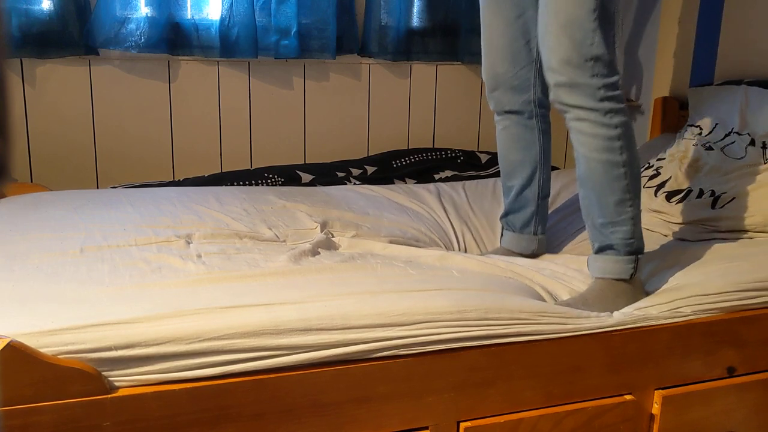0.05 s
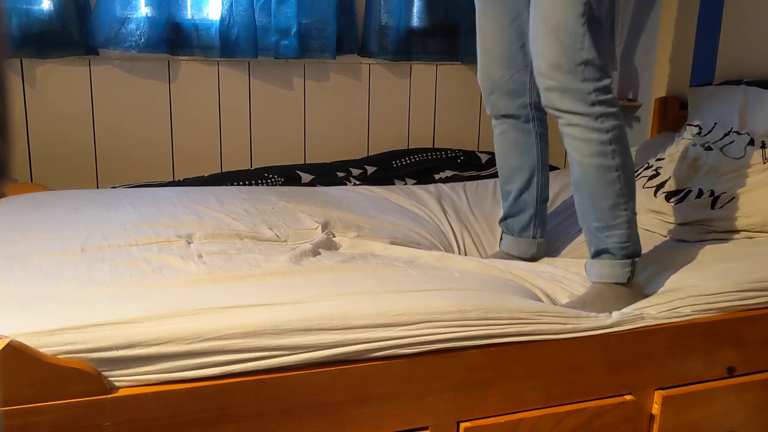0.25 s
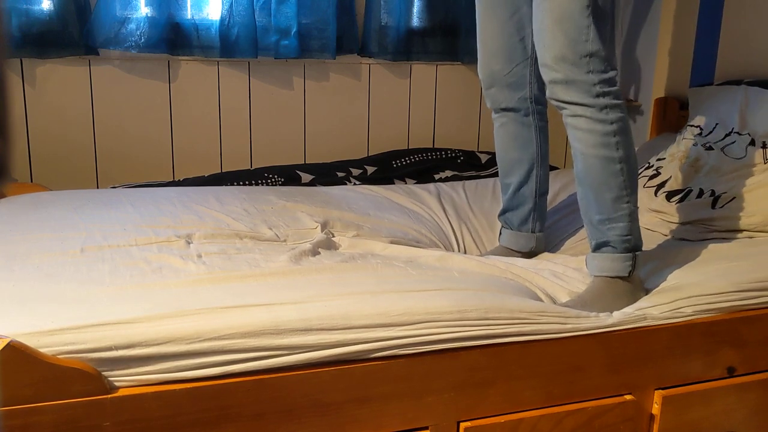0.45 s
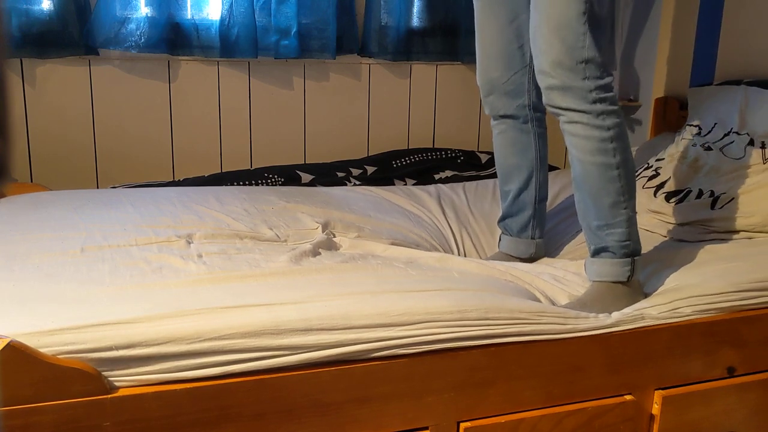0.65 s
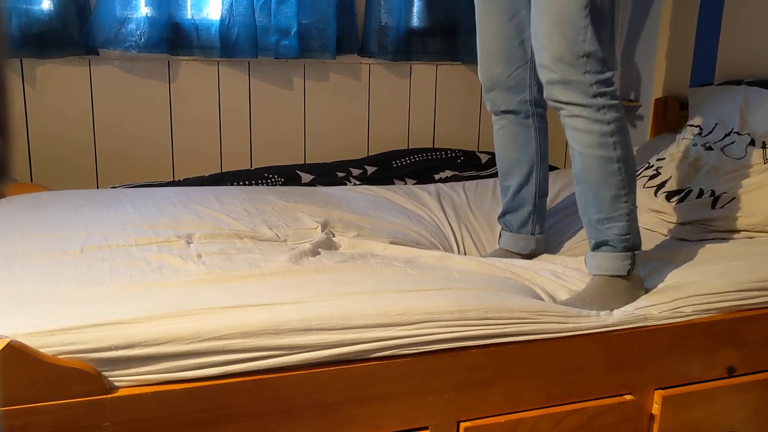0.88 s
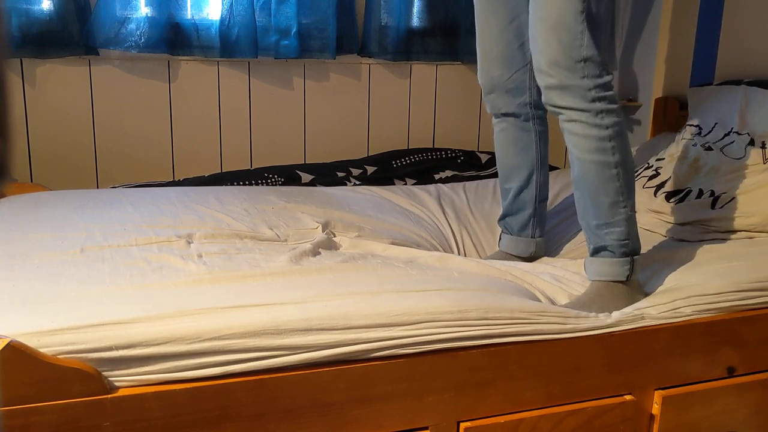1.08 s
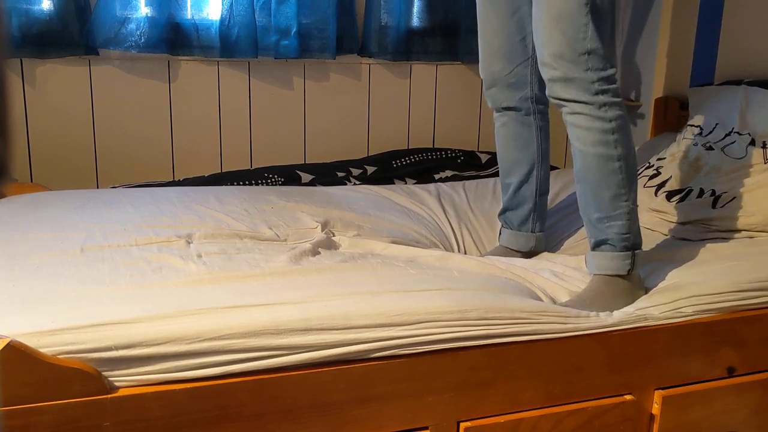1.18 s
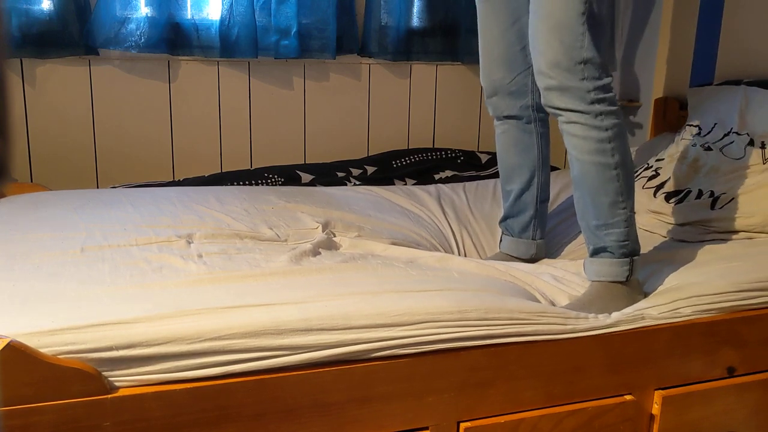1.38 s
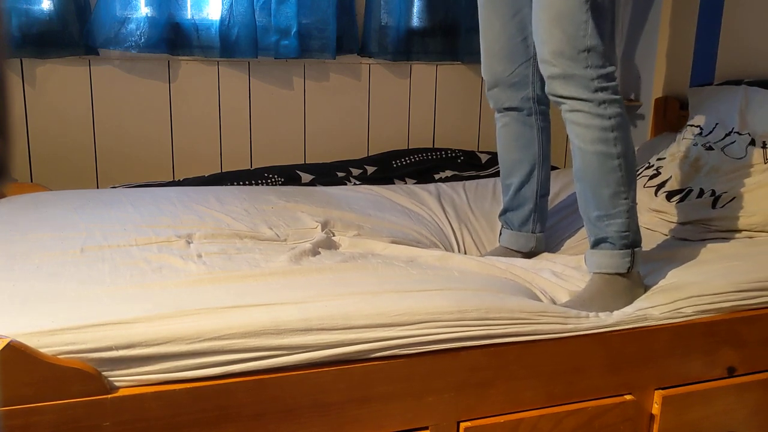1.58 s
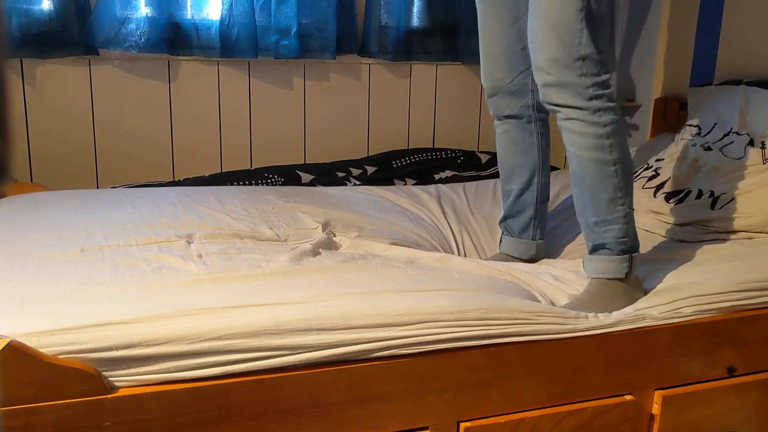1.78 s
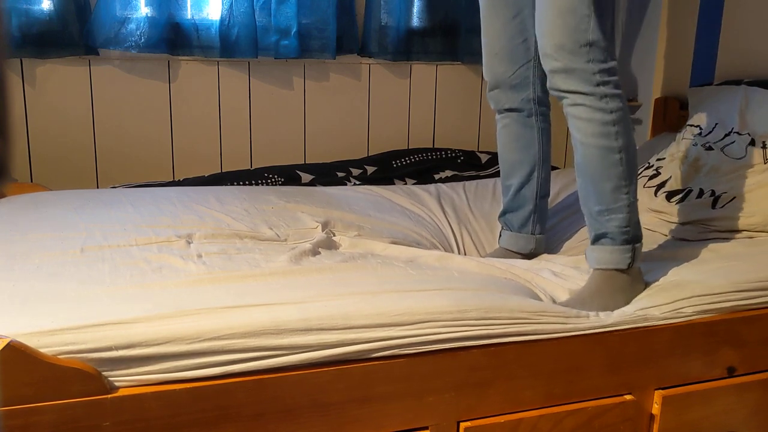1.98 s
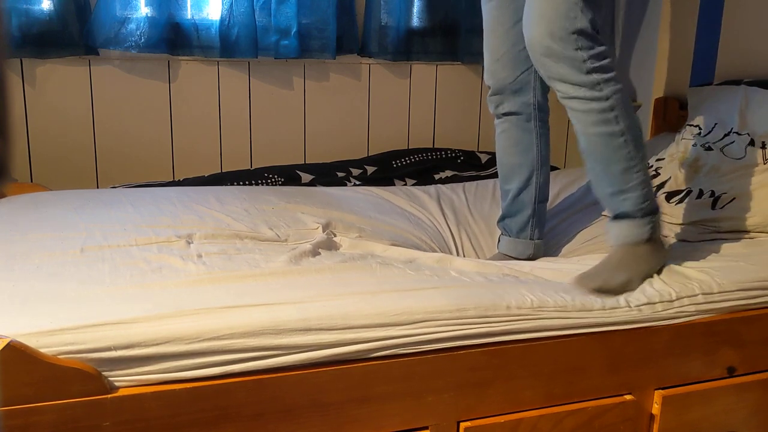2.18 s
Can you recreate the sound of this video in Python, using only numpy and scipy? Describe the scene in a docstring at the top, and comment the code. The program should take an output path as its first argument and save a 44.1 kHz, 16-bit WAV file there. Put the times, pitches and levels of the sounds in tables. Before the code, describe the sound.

Worn wooden bed slats give one loud crack, then a few duller knocks as someone standing on the bed shifts their weight. Soft mattress thuds and faint cloth rustle lie underneath, picked up inside a small, quiet bedroom.

```python
"""Worn bed slats slip on their frame as a person standing on the bed shifts their weight.
One loud crack, then a few duller knocks, each ringing the wood and the small, quiet bedroom.
Underneath, the mattress thuds softly as it settles; bedding and denim rustle over faint room tone.
The stereo microphone is in the room with the bed, and the wood reaches its left side first."""
import sys
import numpy as np
from scipy import signal
from scipy.fft import rfft, irfft
from scipy.io import wavfile
from scipy.ndimage import uniform_filter1d

SR = 44100
rng = np.random.default_rng(int(sys.argv[2]) if len(sys.argv) > 2 else 0)


def to_wav(sig):
    """Store sig (one row per channel, or 1-D mono) as 16-bit WAV at the path in sys.argv[1].

    Samples outside -1..1 are clipped; the rate is SR.
    """
    pcm = np.clip(np.atleast_2d(sig), -1, 1) * 32767
    pcm = np.round(pcm).astype(np.int16)
    wavfile.write(sys.argv[1], SR, pcm.T)  # frames by channels


N = 99225
RING_T = np.arange(int(.6 * SR)) / SR

# slats slipping on the frame: start_s, level_db, lowpass_hz, bass_db, modes_db, kind
SLAT_SLIPS = [(0.2243, -11.5, 2260, 13, -7.5, "crack"), (0.2319, 0, 5600, -7, -1, "crack"),
              (0.2412, -6.5, 3070, -16, -12, "crack"), (.333, -20.5, 240, 9, -9, "tock"),
              (1.0946, -14, 1440, 5.5, -1.5, "clack"), (1.1183, -24, 750, -21, -1, "clack"),
              (1.4911, -34.5, 220, 11.5, -8, "tock"), (1.5103, -31, 785, 7.5, -8, "clack"),
              (1.8911, -26.5, 400, 0, 1.5, "tock"), (1.8952, -20, 1046, -2.5, 1.5, "tock"),
              (2.2192, -21.5, 1175, -10, 4.5, "tock")]
SLIP_KINDS = ["crack", "clack", "tock"]  # each wakes the modes in its own proportions
# modes of slats and frame: pitch_hz, crack_db, clack_db, tock_db
FRAME_MODES = [(119.8, -25.5, -30, -24), (194.2, -26.5, -29.5, -58), (285.3, -26.5, -31, -22),
               (399.7, -36, -27.5, -29), (447.2, -36, -36, -34), (483, -25.5, -25.5, -24),
               (551, -23, -27, -31), (602.2, -25, -33.5, -30.5), (662, -30.5, -22, -54),
               (721, -36, -26, -44), (768, -27.5, -29.5, -35), (810.4, -30.5, -41, -36),
               (933, -26.5, -38, -50.5), (992, -39.5, -28, -33), (1065, -45.5, -36, -30),
               (1215, -30, -25, -35), (1321.5, -24.5, -24.5, -42), (1420, -26.5, -46, -32),
               (1617, -35, -39, -35), (1990, -22.5, -38, -64), (2640, -35.5, -53, -48),
               (2827, -37.5, -44, -41.5), (3300, -36.5, -42, -39)]
MODE_T60_S, MODE_DAMPING = 0.12, .08  # ring time at 500 Hz; power of frequency that shortens it
MODE_RISE_S, MODE_HOLD_S = 0.01, 0.019  # the frame swells and holds a moment before it dies away
MODE_SPREAD_RAD = 0.61  # standing waves in the room shift a mode's phase between the channels

# dense ring of the wood in the room: frequency_hz, band_level_db
WOOD_SPECTRUM = [(45, -24.5), (80, -5.5), (150, -9), (220, -3.5), (330, 0.5), (600, 4), (1000, 2.5),
                 (1400, 9.5), (1700, 3.5), (2200, 5.5), (3100, 3.5), (3900, -4.5), (7000, -5), (15000, -22)]
# decay of that ring: frequency_hz, t60_s
WOOD_DECAY = [(60, .35), (150, 0.17), (300, 0.19), (600, 0.13), (1500, 0.16), (4000, 0.14), (10000, 0.19)]
# build-up of that ring: frequency_hz, rise_s
WOOD_BUILD_UP = [(80, 0.0062), (500, 0.0017), (1200, 0.0019), (2500, .0006), (8000, 0.001)]
EARLY_DB, EARLY_S = 0, 0.0027  # the treble arrives first, straight from the wood
ROOM_DB, ROOM_T60_S = -34, 0.26  # faint late reverberation
# the bed's balance at the microphone: frequency_hz, left_minus_right_db
BED_BALANCE = [(100, -1), (300, 0), (600, 0.5), (1300, 1), (2300, 3.5), (4500, 8.5), (8000, 1)]
# how alike the bed sounds in both channels: frequency_hz, correlation
BED_LIKENESS = [(100, 0.85), (300, 0.78), (1000, 0.91), (4000, 0.22), (10000, 1)]
LEFT_LEAD_S = 0.00028

# dry ticks of splintered wood: start_s, level_db
SPLINTER_TICKS = [(0.2322, -12), (1.0957, -32), (2.233, -32.5)]
TICK_T60_S, TICK_TAIL_DB, TICK_TAIL_T60_S, TICK_BAND_HZ = .012, -12, .2, [2500, 8000]
# the mattress settling: start_s, level_db, pitch_hz
MATTRESS_THUDS = [(0.351, -43, 90.4), (0.376, -49.5, 65.6), (0.697, -59.5, 118.3), (.862, -59.5, 86.7),
                  (1.107, -42.5, 77.2), (1.173, -52, 108.5), (1.533, -51, 82.4), (1.965, -54.5, 78.7),
                  (2.141, -53, 126.6)]
THUD_RISE_S, THUD_T60_S, THUD_SAG_PER_S = 0.0078, 0.31, 1
# rubs of bedding and denim: start_s, length_s, level_db, lowpass_hz
CLOTH_RUBS = [(0.194, 0.075, -61, 1390), (0.401, 0.084, -62, 880), (.64, 0.18, -69, 700),
              (0.858, 0.046, -64, 397), (.902, 0.035, -66, 2230), (1.185, 0.071, -63, 300),
              (1.3, .08, -67.5, 400), (1.46, 0.085, -73, 794), (1.632, 0.082, -69.5, 300),
              (2.08, 0.19, -69.5, 780), (2.132, 0.077, -64, 2310)]
RUB_HIGHPASS_HZ, CLOTH_GRAIN_DB = 231, 2
# swish of denim as the legs move: time_s, level_db
DENIM_SWISH = [(0, -76), (.2, -75), (.55, -87), (.7, -78.5), (.95, -81.5), (1.8, -86), (2.099, -81.5),
               (2.25, -71)]
DENIM_BAND_HZ = [3500, 9500]

# still air of the bedroom: frequency_hz, density_db
AIR_SPECTRUM = [(25, -20.5), (55, 4), (86, -5), (122, -2.5), (200, -9.5), (285, -9), (340, -16),
                (465, -8.5), (740, -18), (920, -15), (1450, -22.5), (2700, -27), (6500, -29.5),
                (10000, -36), (15500, -36.5)]
# how alike the air sounds in both channels: frequency_hz, correlation
ROOM_TONE_LIKENESS = [(30, 0.504), (90, 0.924), (300, 0.53), (1000, 0.12), (5000, 0.035)]
AIR_DB = -64
MIC_LOW_HZ, RECORDER_TOP_HZ = 33.4, 15900


def slats():
    """Each slip strikes the wood; the softer the contact, the less treble it wakes."""
    out = np.zeros((2, N))
    mode_levels = dict(zip(SLIP_KINDS, np.transpose(FRAME_MODES)[1:]))
    for start_s, level_db, lowpass_hz, bass_db, modes_db, kind in SLAT_SLIPS:
        ring = wood_ring() + amp(modes_db) * frame_ring(mode_levels[kind])
        ring = filtered(ring, lowpass_hz, "low")
        ring += (amp(bass_db) - 1) * filtered(ring, 120, "low", order=1)  # bass shelf
        add(out, start_s, amp(level_db) * ring)
    return out


def wood_ring():
    """Countless wood modes and close reflections, each band swelling and dying at its own speed."""
    t = RING_T
    hz, noise = noise_pair(BED_LIKENESS, len(t))
    noise[1] *= np.exp(-2j * np.pi * hz * LEFT_LEAD_S)  # delays the right channel
    centres = np.geomspace(45, 15000, 26)
    room_tail = amp(ROOM_DB) * fade(t, ROOM_T60_S)
    out = np.zeros((2, len(t)))
    for centre in centres:
        bands_away = np.log((hz + 1) / centre) / np.log(centres[1] / centres[0])
        band = irfft(noise * np.cos(np.pi / 2 * np.clip(bands_away, -1, 1)), len(t))
        rise = 1 - np.exp(-t / read(WOOD_BUILD_UP, centre))
        early = amp(EARLY_DB) * centre / (centre + 3000) * np.exp(-t / EARLY_S)
        band *= rise * (fade(t, read(WOOD_DECAY, centre)) + early + room_tail)
        band /= np.linalg.norm(band, axis=1, keepdims=True)
        out += band * amp(read(WOOD_SPECTRUM, centre)) * sides(centre)
    return amp(-9.5) * out


def frame_ring(levels_db):
    """Strong modes of slat and frame, pushed in alternate directions, arriving on the left first."""
    t = np.maximum(RING_T - np.array([[0], [LEFT_LEAD_S]]), 0)
    held_t = np.hypot(t, MODE_HOLD_S) - MODE_HOLD_S
    phases = MODE_SPREAD_RAD * (2 * rng.random((len(FRAME_MODES), 1, 1)) - 1) * np.array([[1], [-1]])
    ring = np.zeros_like(t)
    for k, (hz, *_) in enumerate(FRAME_MODES):
        t60 = MODE_T60_S * (500 / hz) ** MODE_DAMPING
        swing = np.sin(2 * np.pi * hz * t + phases[k] * hz / (hz + 300))
        ring += (-1) ** k * amp(levels_db[k]) * sides(hz) * fade(held_t, t60) * swing
    return ring * (1 - np.exp(-t / MODE_RISE_S))


def splinters():
    """Splintered wood gives short bright snaps with a faint room tail."""
    out, t = np.zeros((2, N)), RING_T
    envelope = fade(t, TICK_T60_S) + amp(TICK_TAIL_DB) * fade(t, TICK_TAIL_T60_S)
    for start_s, level_db in SPLINTER_TICKS:
        snap = rng.standard_normal((2, len(t))) * envelope
        snap = filtered(snap, TICK_BAND_HZ, "band") / np.linalg.norm(snap[0])
        add(out, start_s, amp(level_db) * sides(8000) * snap)
    return out


def mattress():
    """Soft low thuds that sag in pitch as the springs take the weight."""
    out, t = np.zeros((2, N)), RING_T
    envelope = (1 - np.exp(-t / THUD_RISE_S)) * fade(t, THUD_T60_S)
    for start_s, level_db, pitch_hz in MATTRESS_THUDS:
        cycles = np.cumsum(pitch_hz * np.exp(-THUD_SAG_PER_S * t)) / SR
        thud = amp(level_db) * envelope * np.sin(2 * np.pi * cycles)
        add(out, start_s, np.array([thud, thud]))
    return out


def bedding():
    """Grainy cloth friction that swells quickly and dies away."""
    out, t = np.zeros((2, N)), RING_T
    for start_s, length_s, level_db, lowpass_hz in CLOTH_RUBS:
        grain = cloth_grain(len(t), smoothing_samples=120)
        _, noise = noise_pair(BED_LIKENESS, len(t))
        rub = filtered(irfft(noise, len(t)) * grain, lowpass_hz, "low")
        rub = filtered(rub, RUB_HIGHPASS_HZ, "high", order=1)
        swell = 4 * t / length_s  # the rub peaks a quarter of the way in
        add(out, start_s, amp(level_db) * unit(rub) * swell * np.exp(1 - swell))
    return out


def denim():
    """A thin, slightly grainy swish that follows the legs."""
    time_s, level_db = np.transpose(DENIM_SWISH)
    grain = cloth_grain(N, smoothing_samples=200)
    swish = filtered(rng.standard_normal((2, N)), DENIM_BAND_HZ, "band", order=1) * grain
    return unit(swish) * amp(np.interp(np.arange(N) / SR, time_s, level_db))


def cloth_grain(size, smoothing_samples):
    """Quick random flutter in the level of rubbing cloth."""
    return amp(CLOTH_GRAIN_DB * unit(uniform_filter1d(rng.standard_normal(size), smoothing_samples)))


def room_tone():
    """Low rumble and thin hiss of the still bedroom."""
    hz, noise = noise_pair(ROOM_TONE_LIKENESS, N)
    return amp(AIR_DB) * unit(irfft(noise * amp(read(AIR_SPECTRUM, hz)), N))


def noise_pair(likeness, size):
    """Frequencies and spectra of two partly alike white noises, left and right."""
    hz = np.fft.rfftfreq(size, 1 / SR)
    a, b = rfft(rng.standard_normal((2, size)))
    same = np.clip(read(likeness, hz), 0, 1)
    mid, side = a * np.sqrt((1 + same) / 2), b * np.sqrt((1 - same) / 2)
    return hz, np.array([mid + side, mid - side])


def sides(hz):
    """Left and right gain of the bed at the microphone."""
    return amp(read(BED_BALANCE, hz) * np.array([[.5], [-.5]]))


def amp(db):
    """Decibels to gain."""
    return 10 ** (np.asarray(db) / 20)


def read(points, hz):
    """Reads a table on a log-frequency axis."""
    frequency_hz, value = np.transpose(points)
    return np.interp(np.log(hz + 1), np.log(frequency_hz), value)


def add(mix, start_s, sound):
    """Lays a stereo sound into the mix."""
    part = mix[:, round(start_s * SR):][:, :sound.shape[1]]
    part += sound[:, :part.shape[1]]


def unit(x):
    """Scales to rms 1."""
    return x / np.sqrt(np.mean(x ** 2) + 1e-20)


def filtered(x, hz, kind, order=2):
    """Causal Butterworth filter."""
    return signal.sosfilt(signal.butter(order, hz, kind, fs=SR, output="sos"), x)


def fade(t, t60):
    """Exponential decay, 60 dB down at t60."""
    return np.exp(-np.log(1000) * t / t60)


def scene():
    """The bed in front, the quiet room behind it."""
    return slats() + splinters() + mattress() + bedding() + denim() + room_tone()


def record(dry):
    """The microphone sheds the deepest rumble; the recorder cuts the highest treble."""
    thinned = filtered(dry, MIC_LOW_HZ, "high")
    band_limit = signal.firwin(511, RECORDER_TOP_HZ, window=("kaiser", 9), fs=SR)
    return signal.oaconvolve(thinned, band_limit[None], "same")


dry = scene()
out = record(dry)
to_wav(out)
```